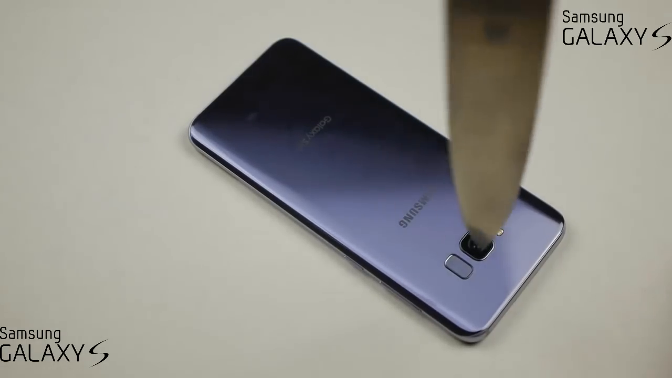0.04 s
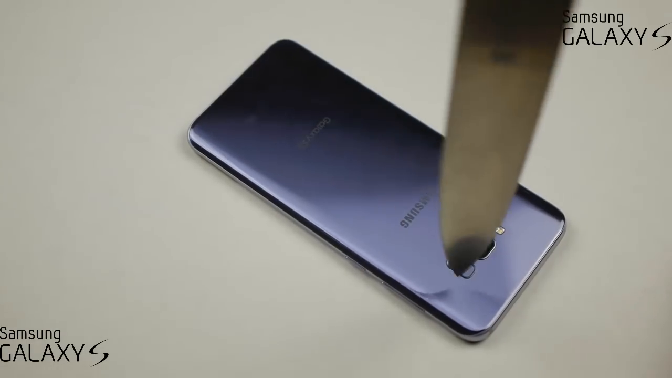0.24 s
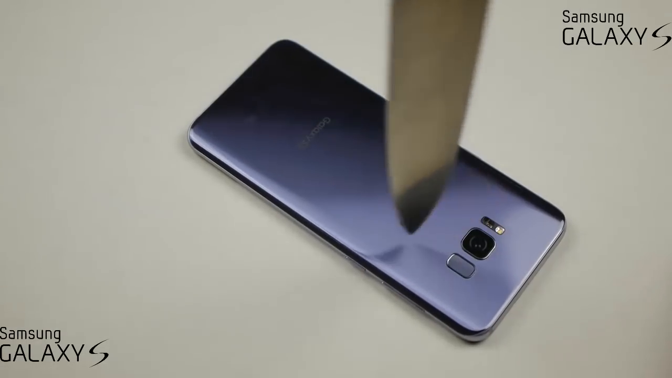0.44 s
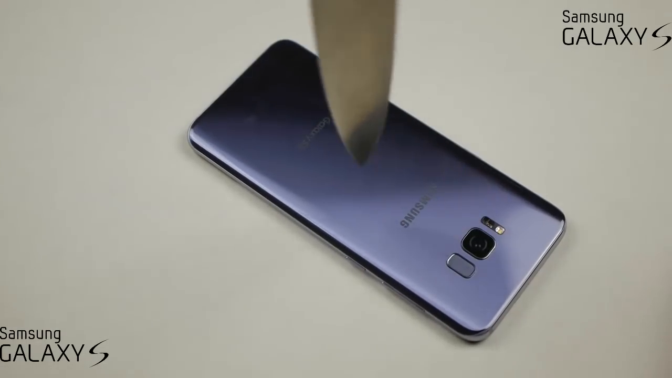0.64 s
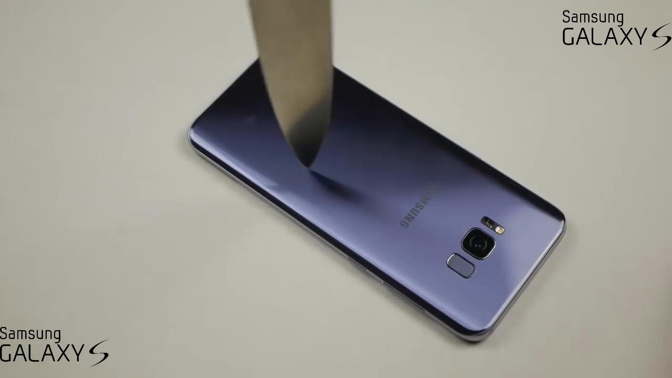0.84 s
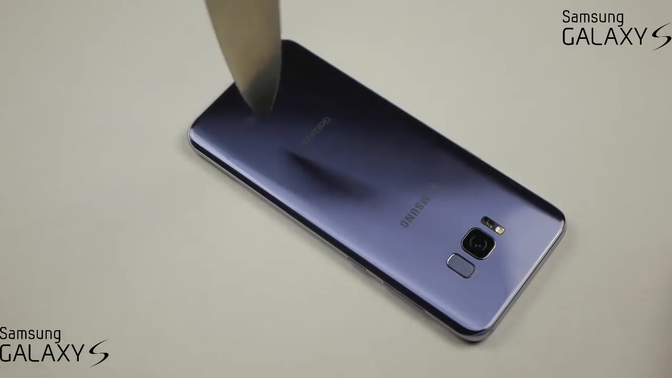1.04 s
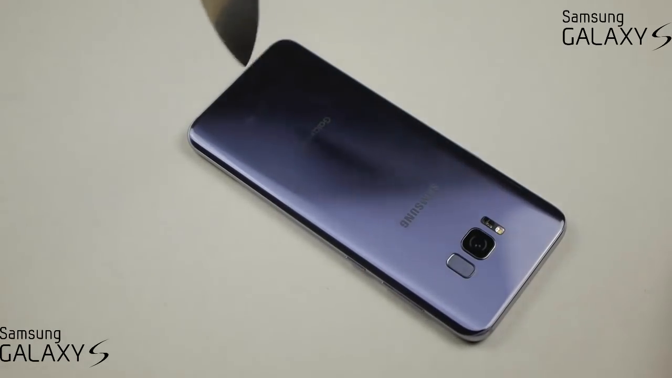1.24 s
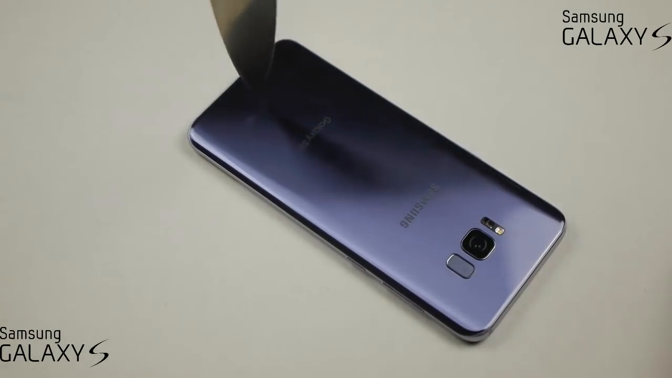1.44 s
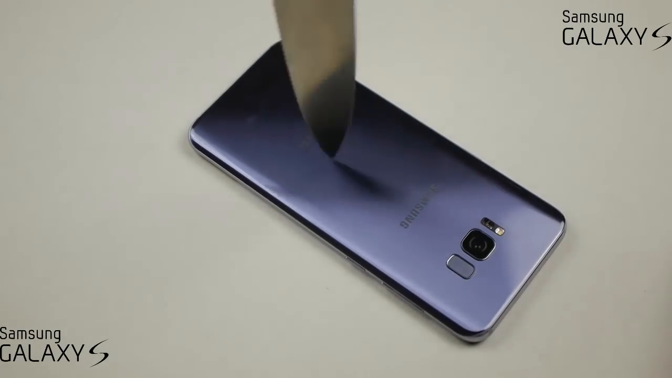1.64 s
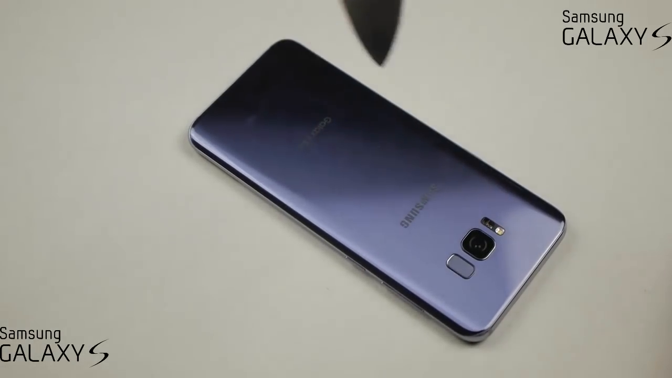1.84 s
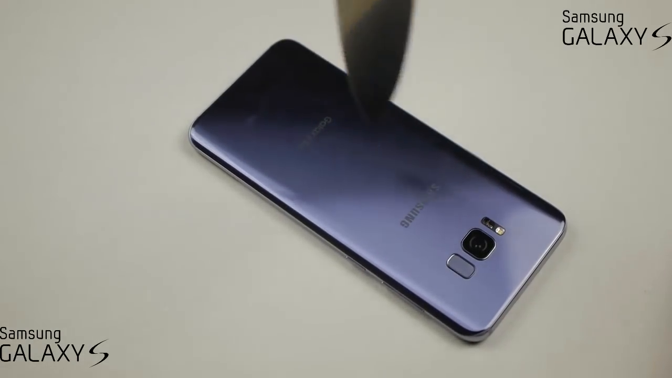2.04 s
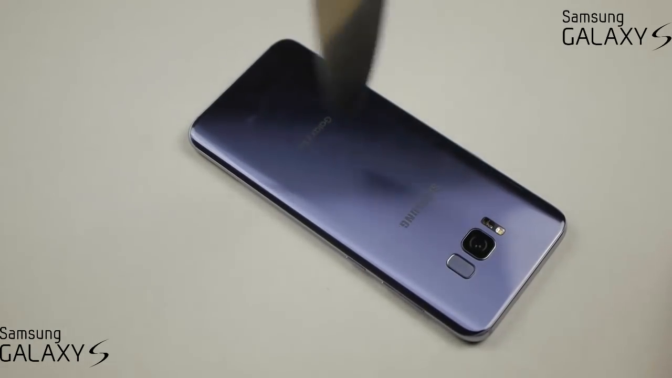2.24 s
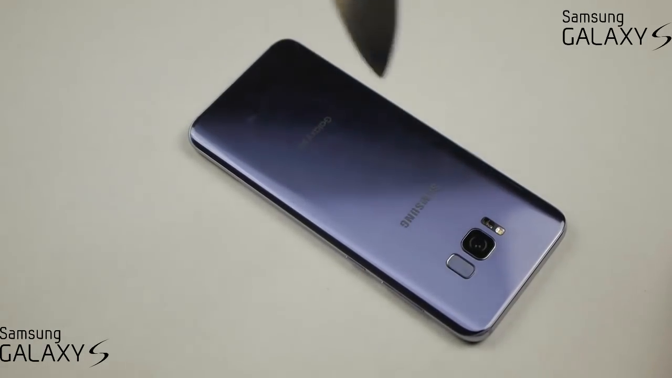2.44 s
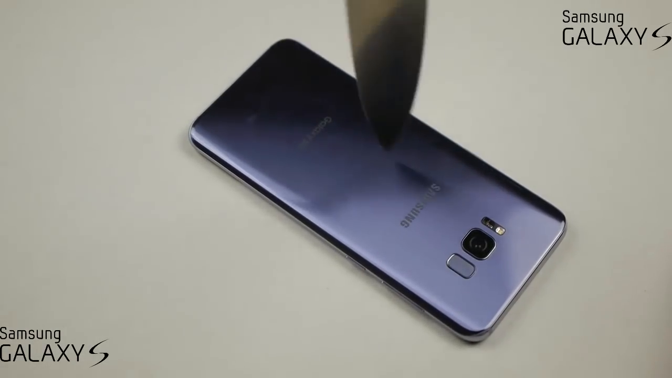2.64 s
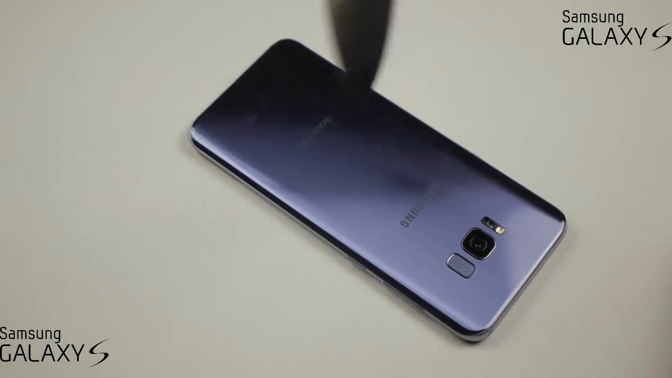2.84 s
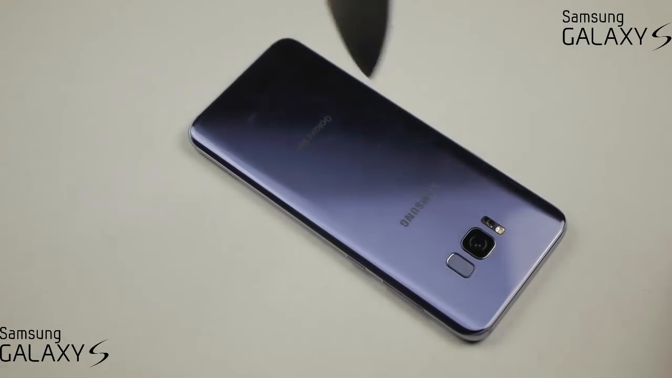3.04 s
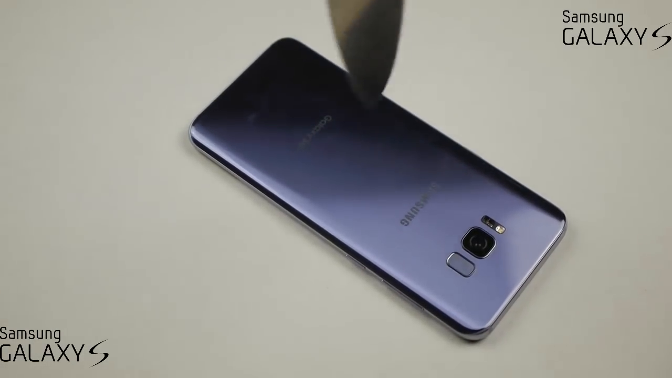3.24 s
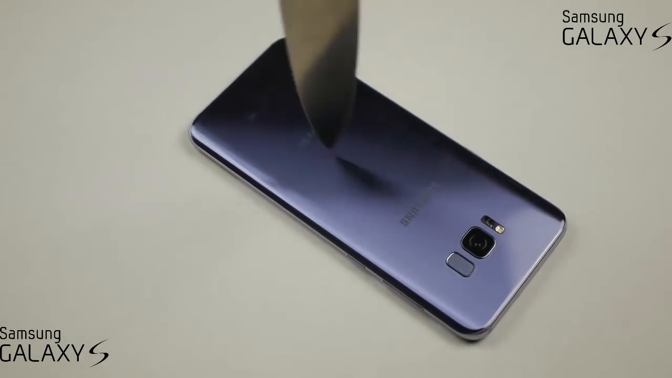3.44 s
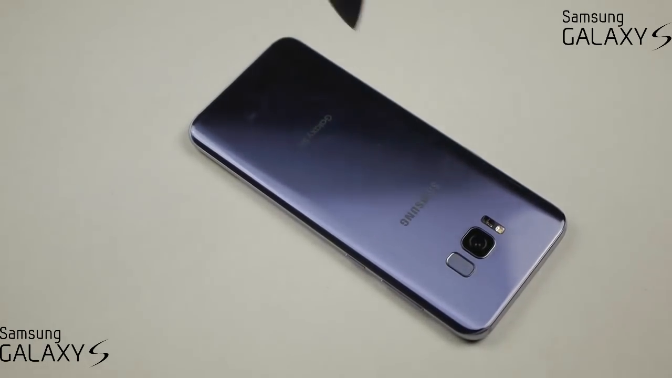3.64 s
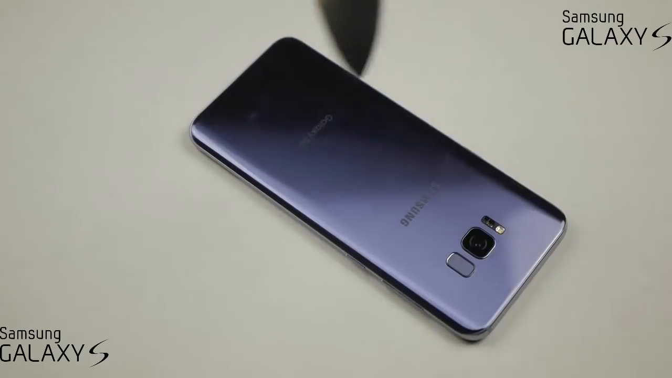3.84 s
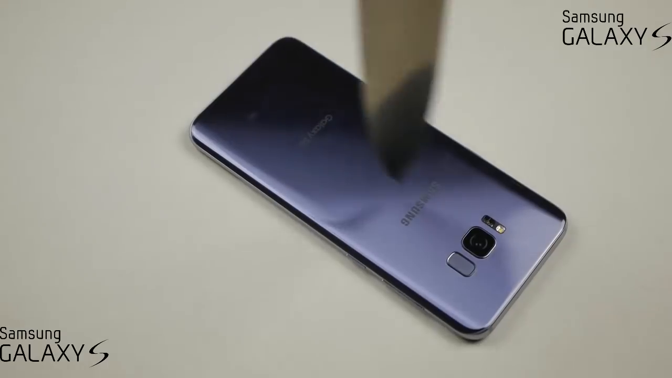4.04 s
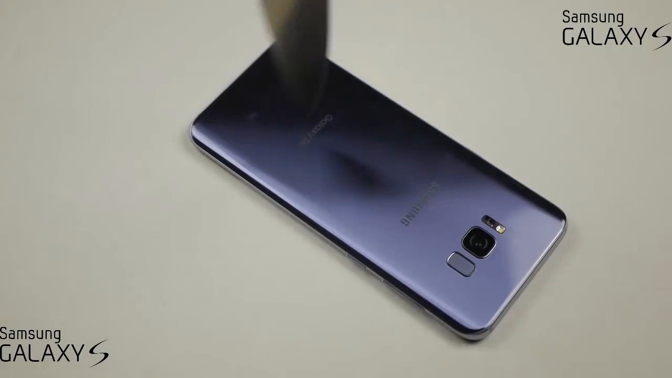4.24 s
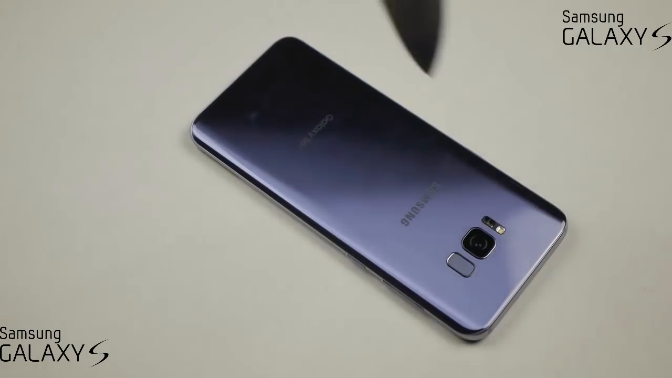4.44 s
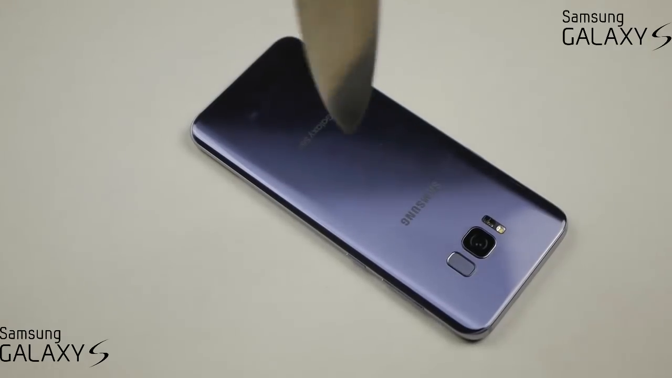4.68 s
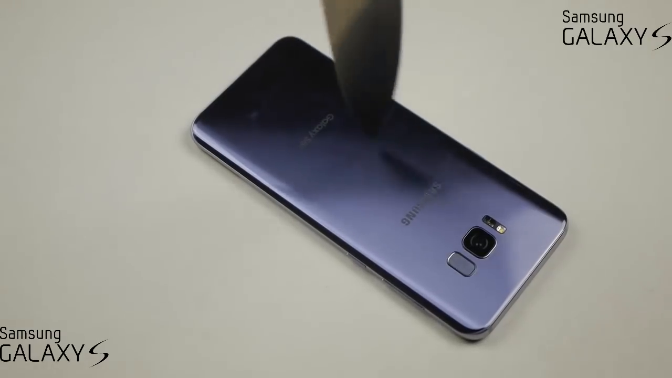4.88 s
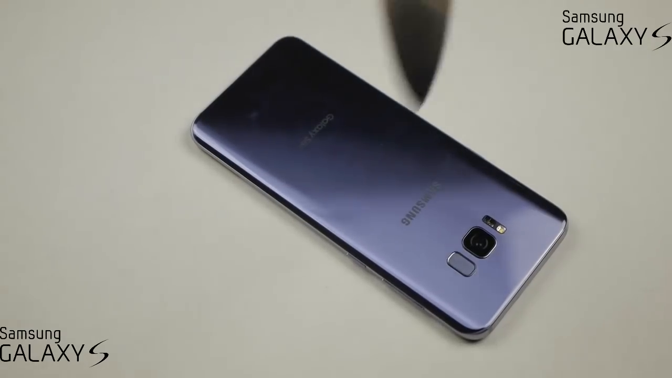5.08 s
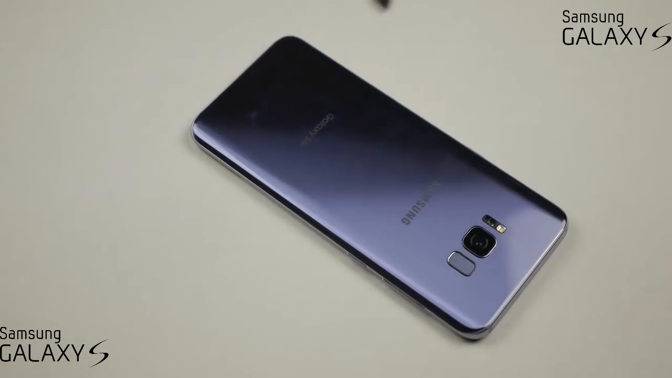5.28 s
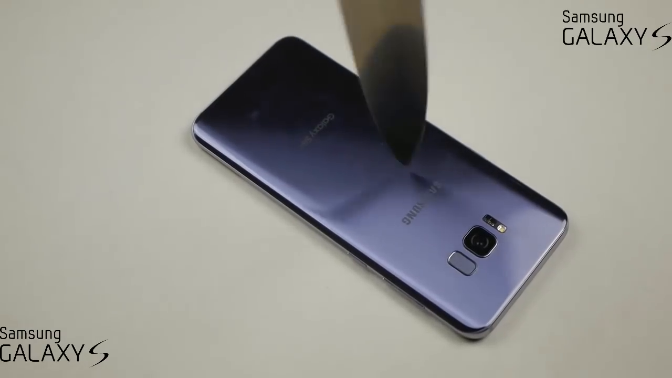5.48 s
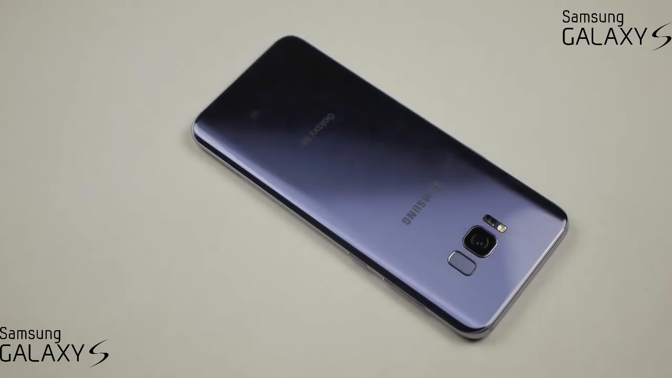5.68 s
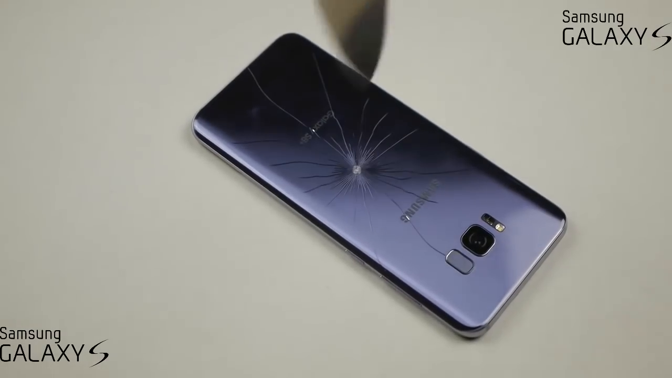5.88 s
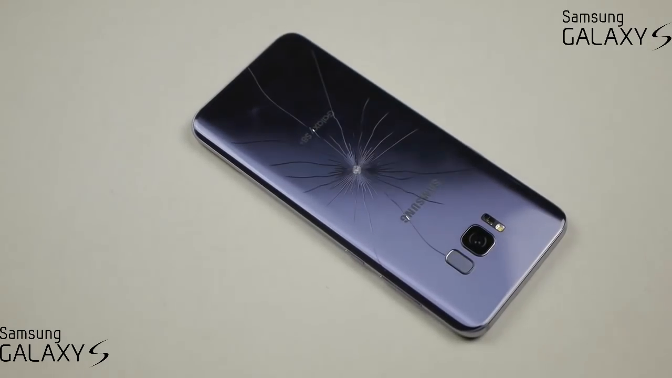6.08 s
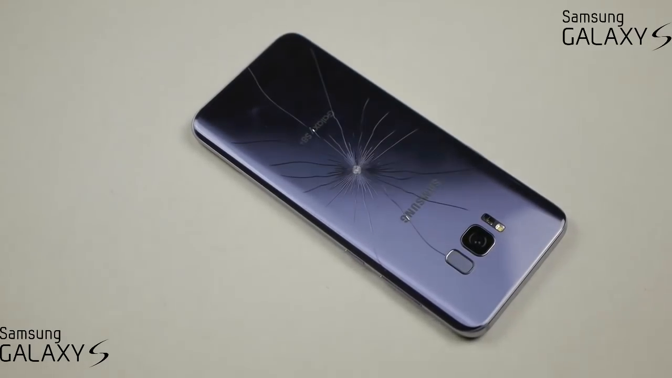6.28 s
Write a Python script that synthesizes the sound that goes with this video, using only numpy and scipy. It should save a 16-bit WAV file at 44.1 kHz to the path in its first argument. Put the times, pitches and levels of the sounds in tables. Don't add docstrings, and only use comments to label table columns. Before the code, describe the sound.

Very close stereo pickup in a quiet small room. A steel knife point taps the glass back of a phone lying on a table about three times a second. Each hard tick carries a loud, overloaded table thump and a short hollow ring. Tone shifts from spot to spot, until the last blow splits the glass and a tiny chip tinkles.

```python
import sys
import numpy as np
from scipy import signal
from scipy.io import wavfile
from scipy.ndimage import uniform_filter1d

SR = 44100
rng = np.random.default_rng(int(sys.argv[2]) if len(sys.argv) > 2 else 0)


def convert_level_to_amplitude(level_db):
    exponent = np.asarray(level_db, float) / 20
    return 10 ** exponent


def store_wav(level_fs):
    pcm = np.round(np.clip(np.atleast_2d(level_fs), -1, 1) * 32767)
    wavfile.write(sys.argv[1], SR, pcm.T.astype(np.int16))


N = 278445

# start_s, tick_peak_db, glass_pitch_hz, contact_sharpness_db, room_brightness_db
BLOWS = [(-0.0605, -8, 2660, -3.1, -2), (0.266, -6, 2600, 3.5, 3.5), (0.5823, -7.5, 3480, 3.5, -4.5),
         (0.8763, -5, 7300, -18, -4.5), (1.1783, -8.5, 1310, 13, 1.4), (1.4733, 0, 6740, -23.5, 4),
         (1.7553, -4.5, 1838, 12.5, -3), (2.0587, 1.5, 7300, -9, 0), (2.38, 0, 2770, 6, -1.5),
         (2.676, -1, 1740, 4.5, -0.3), (2.9702, 2, 3070, -3, 0), (3.2297, -4, 2050, 8, 1),
         (3.515, -5, 4080, 8, -1.5), (3.803, 3.3, 1850, -15.5, 0.7), (4.0839, 1, 2220, -13, 3),
         (4.3732, 2.7, 1740, -0.5, 1.5), (4.651, -13.5, 2027, 12.5, -0.5), (4.9235, -8, 4120, 12.5, 1),
         (5.2243, -2.5, 3854, 3, 3), (5.522, -1, 4180, -3, 4), (5.8713, -0.6, 4330, 1.5, 4.5)]
# time_s, blow_to_table_db, ring_length_factor, favoured_pitch_hz
TIP_PATH = [(-0.06, -3.5, 0.98, 1440), (0.27, -5, 0.97, 3300), (0.58, -0.7, 1, 6740),
            (0.88, -0.5, 0.98, 7300), (1.18, -3, 0.94, 1720), (1.47, -2.5, 1.03, 1300),
            (1.76, 0, 1.24, 2800), (2.38, 0.5, 1.074, 900), (3.23, -0.04, 1.085, 990),
            (3.8, -0.2, 1.18, 2530), (4.08, -0.2, 1.103, 5100), (4.65, 0, 1.09, 4100),
            (5.87, -0.5, 1.183, 3900)]
# pitch_hz, level_db, t60_s, polarity
THUMP_MODES = [(151.0, -2.1, 0.066, -1), (287.6, 6.6, 0.028, 1), (428.3, 4.1, 0.033, 1),
               (464.8, -2.5, 0.066, -1), (874.8, 14.3, 0.009, -1), (892.0, 11.3, 0.011, 1)]
# pitch_hz, level_db, t60_s, polarity
RING_MODES = [(123.8, -24.3, 0.099, 1), (141.0, -19.2, 0.278, 1), (159.3, -8.0, 0.124, 1),
              (160.8, -16.9, 0.254, -1), (175.6, -10.1, 0.099, -1), (200.3, -15.3, 0.186, -1),
              (220.7, -10.2, 0.099, -1), (236.8, -24.7, 0.334, -1), (249.0, -14.0, 0.224, -1),
              (262.0, -36.1, 0.726, -1), (281.2, -19.5, 0.457, -1), (295.0, -26.1, 0.448, 1),
              (311.2, -29.7, 0.726, -1), (331.9, -34.7, 0.613, 1), (351.0, -32.5, 0.726, 1),
              (357.3, -18.5, 0.401, -1), (367.9, -17.5, 0.245, 1), (400.5, -40.6, 0.726, -1),
              (413.5, -33.7, 0.529, 1), (427.8, -8.1, 0.099, -1), (457.2, -20.8, 0.284, 1),
              (466.7, -15.2, 0.221, 1), (491.0, -27.6, 0.435, -1), (526.2, -19.4, 0.121, -1),
              (547.3, -34.1, 0.324, 1), (566.1, -39.3, 0.561, 1), (645.3, -46.4, 0.726, 1)]
# pitch_hz, level_db, t60_s
BOOM_MODES = [(110.7, -46.5, 0.9), (203.3, -41, 0.62)]
# freq_hz, density_db_per_hz
BOARD_SPECTRUM = [(80, -17), (200, -2.5), (400, 2.5), (560, -6), (700, -2), (850, -7.5), (960, -20),
                  (1500, -22.5), (3000, -59.5)]
# freq_hz, density_db_per_hz
LOOSE_SPECTRUM = [(80, -25), (160, -10), (300, 0), (450, 0), (650, -8), (1000, -25), (2000, -60)]
# freq_hz, density_db_per_hz
ECHO_SPECTRUM = [(300, -30), (800, 3.5), (1200, 3), (1800, -1.5), (2700, -2), (4200, -8), (6000, -12.5),
                 (11000, -19.5), (14000, -23), (16000, -58)]
# freq_hz, t60_s
ECHO_DECAY = [(100, 0.65), (700, 0.49), (1800, 0.54), (4800, 0.53), (9000, 0.37), (14000, .2)]
# freq_hz, likeness_0_to_1
EAR_LIKENESS = [(100, .1), (500, .2), (800, .75), (1400, .65), (2400, .4), (8000, .35), (15000, .3)]
# start_s, level_db
TWIST_BLOWS = [
    (0.266, -11.5),
    (1.1783, -18),
    (1.4738, -11),
    (2.381, -18),
    (2.677, -14.5),
    (2.9706, -13),
    (4.3734, -7),
]
# pitch_hz, level_db, t60_s
TWIST_MODES = [(1040, 1.5, .03), (1020, -25, 0.26), (1087, -23.5, .26)]
# start_s, peak_db, length_s
CRACK_SPLITS = [
    (5.8708, 2, .0012),
    (5.8722, -3, .001),
    (5.8762, -12, .0015),
    (5.883, -33.5, .004),
    (5.8960, -34, .005),
]
# pitch_hz, level_db, t60_s
PANE_MODES = [(2900, -8, .03), (4350, -10, .03), (4834, -8, .026), (7450, -8, .03), (8969, -8, .015),
              (10890, -12, .04), (13520, 0, .02), (14840, -4, .04)]
# pitch_hz, level_db, t60_s
CHIP_MODES = [(7775, -10, .1), (8980, -2, .2), (9030, -12, .12), (10225, 0, .11), (10940, -6, .04),
              (11500, -8, .07), (12660, -6, .05), (12920, -6, .24), (12990, -11, .2), (13340, 3, .04),
              (14160, -10, .06), (14575, -1, .045), (15600, -1, .035)]
# freq_hz, density_db_per_hz
HUSH_SPECTRUM = [(40, -46.5), (110, -13), (300, -15), (800, -9.5), (2000, -17), (6000, -28), (11000, -26.5),
                 (14000, -32), (16000, -48.5)]

CHIP_S, CHIP_DB = 5.9135, -31
HUSH_DB, ECHO_DB = -62.5, -43
MIC_LOW_HZ, MIC_TOP_HZ = 30, 13600
LOW_DB, LOW_DB_PER_BLOW_DB = 0.9, -1.6
UPPER_DB, UPPER_DB_PER_BRIGHT_DB, UPPER_DB_PER_BLOW_DB = 2.5, 0.27, -0.3
KNOCK_DB, KNOCK_DB_PER_BRIGHT_DB = -1.94, -0.1
SPOT_DB, SPOT_DB_PER_OCTAVE = 6, -0.43
BREAK_LOSS_DB, BREAK_SPARED = 5.5, 1.3
CONTACT_CYCLES = 0.38


def glass_tick(t, tick_db, tick_hz, sharp_db):
    contact = np.diff(snap(t, 0.00026), prepend=0)
    contact = uniform_filter1d(contact, size=2) * convert_level_to_amplitude(sharp_db)
    r = np.exp(-np.pi * 0.35 * tick_hz / SR)
    poles = [1, -2 * r * np.cos(2 * np.pi * tick_hz / SR), r * r]
    glass = signal.lfilter([1, -1], poles, snap(t, 0.0013))
    contact_samples = int(np.clip(CONTACT_CYCLES * SR / tick_hz, 3, 10))
    knock = uniform_filter1d(snap(t, 0.00051), size=contact_samples)
    return convert_level_to_amplitude(tick_db) * (0.68 * contact + 0.64 * glass / abs(glass).max() + 1.9 * knock)


def table_thump(t, board, knock_db, length, low_db):
    stand = ring([(52, -25.0, 0.038)], t)
    thump = convert_level_to_amplitude(0.74) * ring(THUMP_MODES, t, high_db=knock_db)
    modes = stand + thump + ring(RING_MODES + BOOM_MODES, t, length, low_db)
    loose = convert_level_to_amplitude(-26) * noise(len(t), LOOSE_SPECTRUM, lambda f: 0.4 + 0 * f, size=1024)
    stretch = convert_level_to_amplitude(-150 * t * (1 / length - 1))
    return modes * convert_level_to_amplitude([[0.01], [-0.01]]) + onset(t) * (board + loose) * stretch


def room_echo(t, length, echo_db, spot_hz, spot_db):
    hz = np.geomspace(200, 16000, num=40)
    spot = 0.98 * spot_db * np.exp(-(np.log(hz / spot_hz) / 0.47) ** 2)
    colour = np.transpose([hz, read(ECHO_SPECTRUM, hz) + spot])
    echo = noise(len(t), colour, lambda f: read(ECHO_DECAY, f) * length, patchy_db=1.4)
    early = np.zeros_like(echo)
    early[:, :SR // 10] = noise(SR // 10, colour, lambda f: 0.038 + 0 * f)
    return onset(t) * convert_level_to_amplitude(echo_db) * (convert_level_to_amplitude(9.5) * echo + convert_level_to_amplitude(27.5) * early)


def phone_twist(t, twist_db):
    return convert_level_to_amplitude(twist_db) * ring(TWIST_MODES, t)


def glass_crack(t):
    out = np.zeros((2, N))
    for s, peak_db, length_s in CRACK_SPLITS:
        burst = snap(t, length_s, same=0.67)
        pane = signal.fftconvolve(burst[:, :800], ring(PANE_MODES, t)[None], axes=1)[:, :len(t)]
        add(out, s, convert_level_to_amplitude(peak_db) * (0.58 * burst + 0.5 * pane / abs(pane).max()))
    tinkle = ring(CHIP_MODES, t) * convert_level_to_amplitude([[-0.5], [0.5]])
    impact = 3.8 * np.diff(snap(t, 0.0029, same=0.6), prepend=0)
    add(out, CHIP_S, convert_level_to_amplitude(CHIP_DB) * (tinkle + impact))
    wall_spectrum = [(150, -35.5), (1200, -13), (2600, -7), (9000, -5.5), (16000, 0.5)]  # Hz, dB per Hz
    walls = noise(len(t), wall_spectrum, lambda f: read(ECHO_DECAY, f))
    return out + convert_level_to_amplitude(-41) * signal.fftconvolve(out, walls, axes=1)[:, :N]


def room_hush():
    return convert_level_to_amplitude(HUSH_DB) * noise(N, HUSH_SPECTRUM, size=1024)


def onset(t):
    return 1 - np.exp(-t / 0.0014)


def ring(modes, t, length=1, low_db=0, high_db=0):
    out = 0
    for hz, db, t60_s, *polarity in modes:
        db = db + low_db * (hz < 230 and t60_s > 0.15) + high_db * (hz > 800)
        sign = np.sign(polarity or [1])[0]
        out = out + sign * convert_level_to_amplitude(db - 60 * t / (t60_s * length)) * np.sin(2 * np.pi * hz * t)
    return out


def snap(t, length_s, same=0.87):
    middle, side = rng.standard_normal((len(t), 2)).T
    side = np.sqrt(1 - np.clip(same, 0, 1)) * side
    burst = np.array([middle + side, middle - side]) * np.exp(-t / length_s)
    return burst / abs(burst).max()


def noise(count, colour, t60=None, size=256, patchy_db=0):
    hop, hz = size // 4, np.fft.rfftfreq(size, 1 / SR)
    t = np.arange(count // hop + 5) * hop / SR

    def to_sound(z):
        return signal.istft(z, nperseg=size, noverlap=size - hop)[1]

    a, b, c, d, patches = rng.standard_normal((len(t), len(hz), 5)).T
    patches = uniform_filter1d(patches, size=3, axis=0)
    patches = evened(uniform_filter1d(patches, size=60, axis=1))
    same = np.clip(read(EAR_LIKENESS, hz), -1, 1)[:, None]
    left = a + 1j * b
    right = same * left + np.sqrt(1 - same ** 2) * (c + 1j * d)
    z = np.array([left, right]) * convert_level_to_amplitude(read(colour, hz)[:, None] + patchy_db * patches)
    level = np.std(to_sound(z))
    if t60 is not None:
        z = z * convert_level_to_amplitude(-60 * t / t60(hz)[:, None])
    return to_sound(z)[:, :count] / level


def evened(x):
    return x / np.sqrt(np.mean(x ** 2) + 1e-20)


def read(points, hz):
    f, value = np.transpose(points)
    return np.interp(np.log(hz + 1), np.log(f + 1), value)


def add(mix, s, sound):
    at = round(s * SR)
    sound = sound[..., max(-at, 0):]
    part = mix[:, max(at, 0):][:, :sound.shape[-1]]
    part += sound[..., :part.shape[1]]


def scene():
    mix, t = room_hush(), np.arange(SR // 2) / SR
    board = convert_level_to_amplitude(-28.5) * noise(len(t), BOARD_SPECTRUM, lambda f: 0.54 + 0 * f, size=1024).mean(0)
    when_s, *hand = np.transpose(TIP_PATH)
    for row, (s, tick_db, tick_hz, sharp_db, bright_db) in enumerate(BLOWS):
        blow_db, length, spot_hz = (np.interp(s, when_s, v) for v in hand)
        length = np.clip(length, 0.8, 1.3)
        loss_db = BREAK_LOSS_DB * (row == len(BLOWS) - 1)
        upper_db = UPPER_DB + UPPER_DB_PER_BRIGHT_DB * bright_db + UPPER_DB_PER_BLOW_DB * blow_db
        upper_db += BREAK_SPARED * loss_db
        knock_db = KNOCK_DB + KNOCK_DB_PER_BRIGHT_DB * bright_db + BREAK_SPARED * loss_db
        low_db = LOW_DB + LOW_DB_PER_BLOW_DB * blow_db
        spot_db = SPOT_DB + SPOT_DB_PER_OCTAVE * np.log2(spot_hz / 1000)
        tick = glass_tick(t, tick_db, tick_hz, sharp_db)
        thump = table_thump(t, convert_level_to_amplitude(upper_db) * board, knock_db, length, low_db)
        echo = room_echo(t, length, ECHO_DB + bright_db, spot_hz, spot_db)
        add(mix, s - 0.0003, tick)
        add(mix, s, convert_level_to_amplitude(blow_db - loss_db) * thump + echo)
    for s, twist_db in TWIST_BLOWS:
        add(mix, s, phone_twist(t, twist_db))
    return mix + glass_crack(t)


def low_pass(x):
    return signal.sosfilt(signal.butter(12, 16980, fs=SR, output="sos"), x)


def record(dry):
    x = signal.sosfilt(signal.butter(2, MIC_TOP_HZ, fs=SR, output="sos"), dry)
    x = signal.sosfilt(signal.butter(1, MIC_LOW_HZ, "high", fs=SR, output="sos"), x)
    x = convert_level_to_amplitude([[-0.45], [-0.15]]) * x / (1 + abs(x) ** 6) ** (1 / 6)
    x = signal.oaconvolve(x, signal.firwin(61, 15900, fs=SR)[None], "same")
    return low_pass(np.clip(x, -1, 1))


dry = scene()
out = record(dry)
store_wav(out)
```